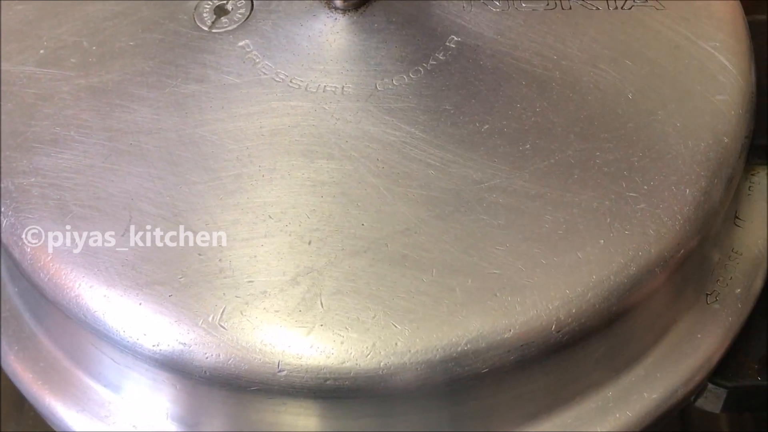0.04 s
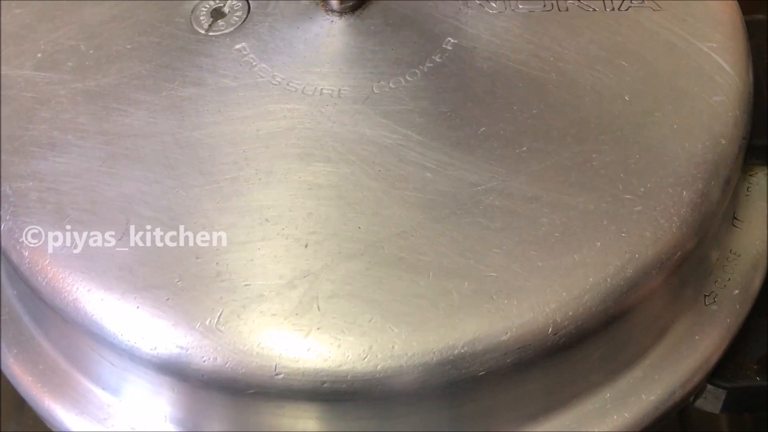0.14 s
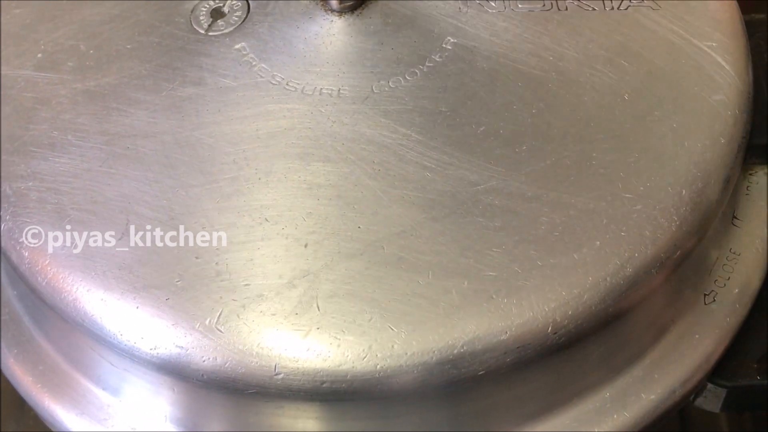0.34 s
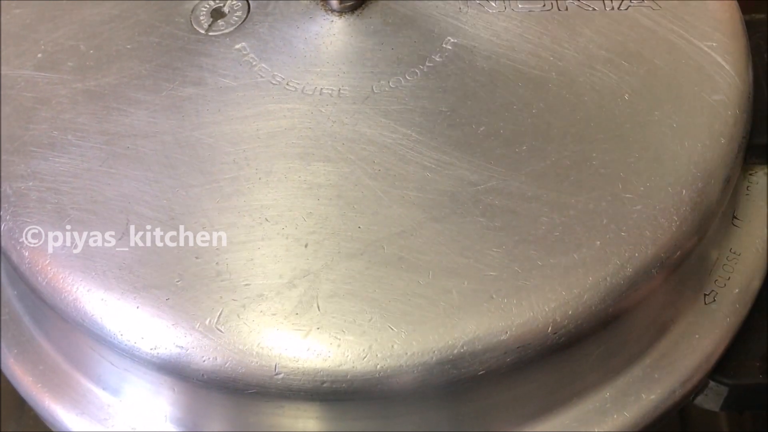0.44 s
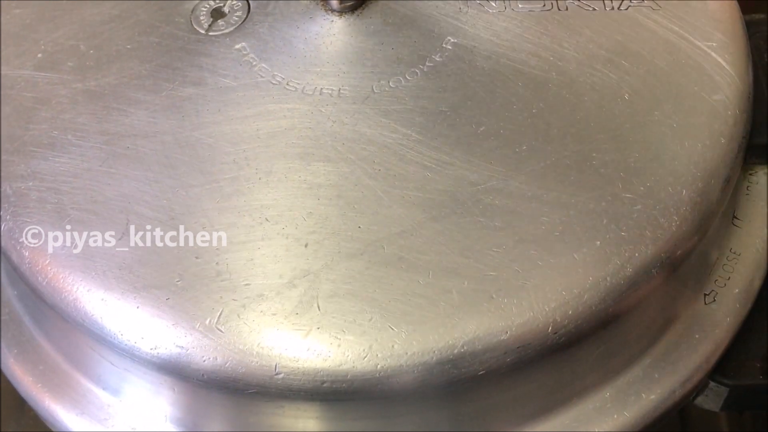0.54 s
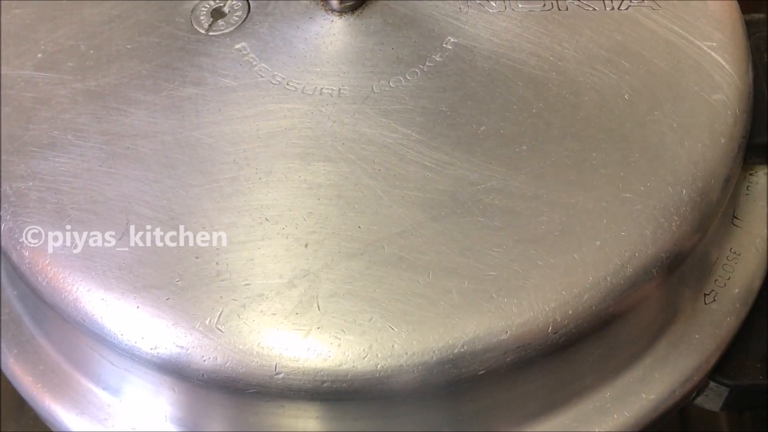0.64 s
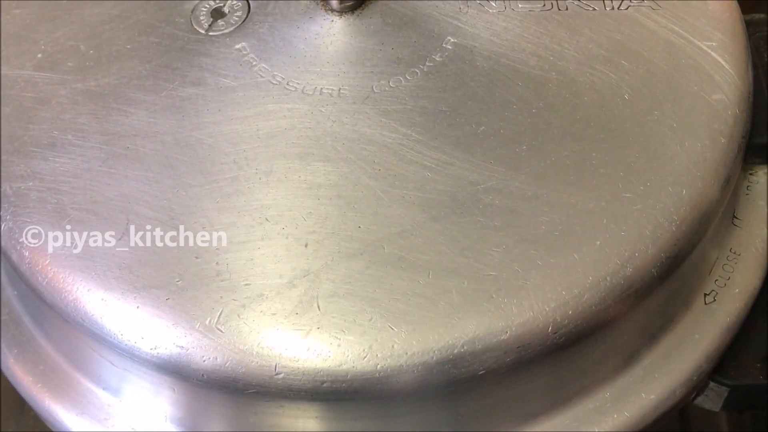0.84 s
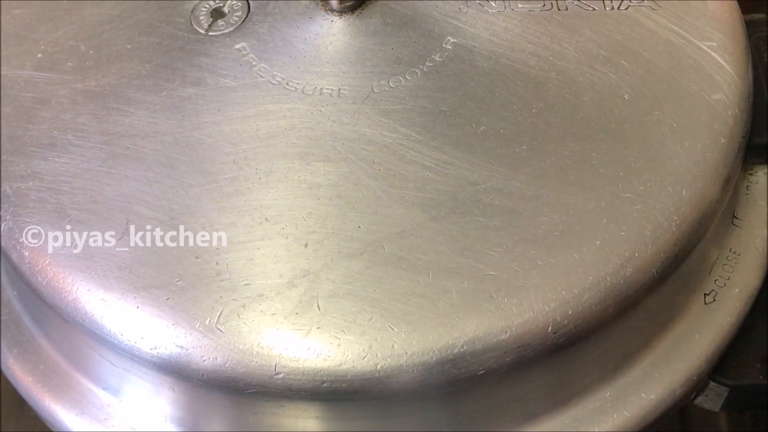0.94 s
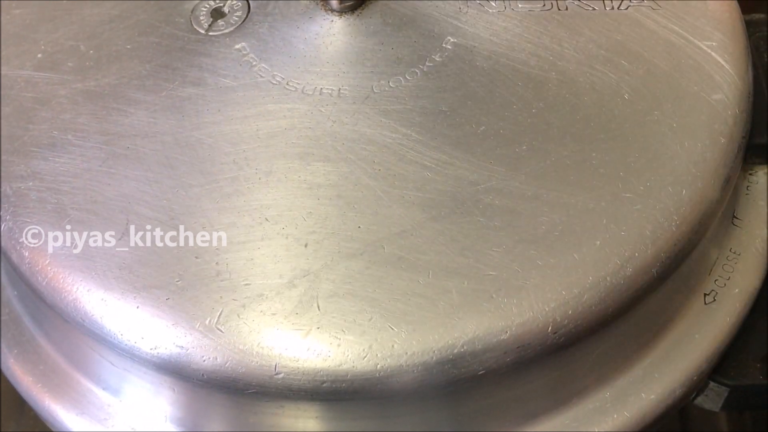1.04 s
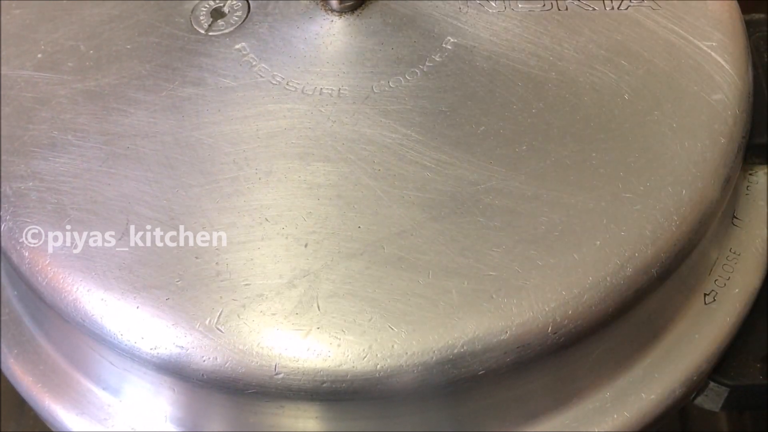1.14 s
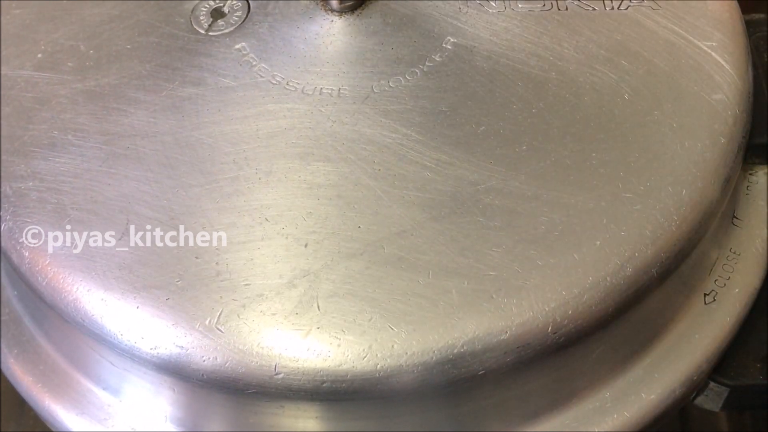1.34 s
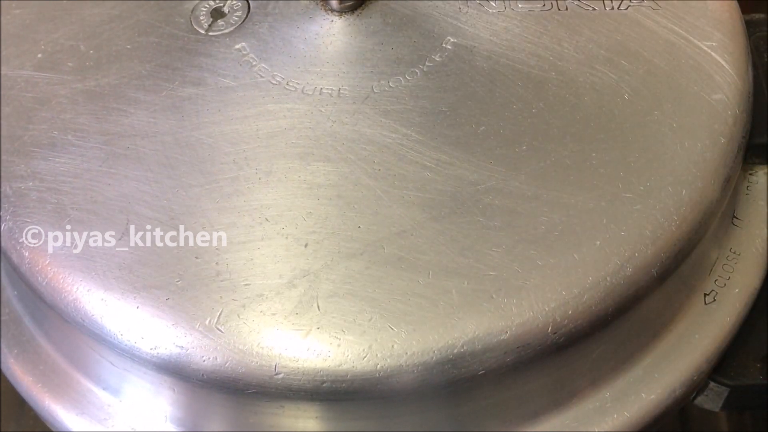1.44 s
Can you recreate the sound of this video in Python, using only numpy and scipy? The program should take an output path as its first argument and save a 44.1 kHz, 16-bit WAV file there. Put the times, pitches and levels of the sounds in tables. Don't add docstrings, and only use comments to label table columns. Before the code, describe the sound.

A pressure cooker lid is twisted loose: quick metal taps, a tiny grind, one bright hard clink with short shimmering ring, then a soft dull knock, over faint hiss and hum, close in a quiet kitchen.

```python
import sys
import numpy as np
from scipy import signal
from scipy.io import wavfile

SR = 44100
rng = np.random.default_rng(int(sys.argv[2]) if len(sys.argv) > 2 else 0)


def generate_wav(signal):
    frames = np.transpose(np.atleast_2d(signal))
    scaled = np.clip(frames, -1, 1) * 32767
    pcm = np.round(scaled).astype(np.int16)
    wavfile.write(sys.argv[1], SR, pcm)


def attenuation_scalar(level_db):
    decades = np.asarray(level_db, float) / 20
    return 10 ** decades


N = 66150

# pitch in Hz, level in dB per Hz.
HUM = [(12, -52), (20, -17), (75, -9), (103, -1), (205, -8), (325, -7.5), (363, -18), (393, -15),
       (900, -23.5), (1170, -54), (1980, -120)]
# pitch in Hz, width in Hz, level in dB.
HUM_LINES = [(101.3, 11, -69), (336, 6, -75.5), (56, 15, -71)]
# pitch in Hz, level in dB per Hz.
HISS = [(350, -31), (600, -8.5), (1390, -1), (2010, -6.5), (4460, -11), (7620, -16), (14700, -18),
        (16000, -21)]
# time in seconds, level in dB.
HISS_LEVEL = [(0, -70.5), (.14, -67.5), (0.221, -69.5), (0.498, -65), (.624, -67), (0.799, -70),
              (1.019, -65), (1.149, -66.5), (1.248, -70), (1.5, -71)]
# time in seconds, level in dB.
TICKS = [(.681, -66), (1.023, -68), (1.099, -68), (1.290, -66), (1.31, -70)]
# center in seconds, half width in seconds, depth in dB.
DUCKS = [(.1075, .008, -28), (.388, .005, -14), (.385, .016, -5), (.535, .007, -16), (.664, .009, -14),
         (.792, .009, -16), (.962, .009, -16), (1.092, .008, -14)]
WHISTLE_HZ = [10130, 13950, 11100, 5800, 14850, 8530, 15200, 11100, 3300, 2570, 14800, 1400, 1350, 1400,
              1500, 4120, 3450]
# start in seconds, length in seconds, level in dB.
WHISTLES = [(0, 1.5, -88), (.6, .09, -84), (.6, .09, -84), (.645, .03, -79), (.76, .1, -81),
            (.76, .11, -81), (.9, .08, -84), (.89, .09, -82), (.94, .04, -78), (.77, .06, -82),
            (1.07, .03, -85), (.65, .03, -76), (.78, .03, -77), (.95, .03, -77), (1.08, .025, -76),
            (.068, .024, -72), (.064, .028, -75)]

# time in seconds, level in dB, contact cut-off in Hz.
TAPS = [(.0925, -36, 2500), (.0945, -34, 2992), (.053, -58, 1489), (.1178, -42.5, 813), (.1612, -35.5, 749),
        (.1720, -46, 800), (.1815, -44.5, 800), (.1892, -41, 900), (.1913, -36, 900), (.1934, -31, 900),
        (.1955, -33, 900), (.2008, -38.5, 900)]
SEATED_HZ = [855, 889, 915, 950, 1040, 1073, 1420, 1477, 1527, 1630, 3345, 3385, 4150, 6379]
# level in dB, time to fall 60 dB in seconds.
SEATED = [(-19.5, .15), (-2, .03), (-12, 0.1), (-2.5, .1), (-14, .04), (-18.5, .11), (-19, 0.022),
          (-11, .1), (1.5, .14), (-14, 0.025), (-9.5, .07), (-3, 0.095), (-5.5, 0.0054), (-12, 0.099)]
# center in seconds, half width in seconds, depth in dB.
GRIP = [(.152, .006, -11.5)]
CRACK_TIMES = [
    .0925,
    .2052,
    .2100,
    .2100,
    .5245,
]
# level in dB, time to fall 60 dB in seconds, lowest Hz, highest Hz.
CRACKS = [(-45, 0.054, 4700, 7000), (-31, 0.049, 4000, 16000), (-21.5, 0.06, 5500, 10000),
          (-31, 0.027, 120, 1800), (-71, 0.083, 340, 1500)]
# time in seconds, level in dB, contact cut-off in Hz.
PUSHES = [
    (.098, -46, 400),
    (.165, -42, 400),
    (.208, -50, 400),
    (.228, -48, 400),
]
# pitch in Hz, level in dB, time to fall 60 dB in seconds.
STAND = [(56.3, -6, 0.56), (106, -1.5, 0.21), (159.5, -3, 0.35), (216.4, -3, 0.063)]

# time in seconds, level in dB, contact cut-off in Hz.
SLIPS = [
    (.2052, -30, 15000),
    (.2063, -33, 15000),
    (.2074, -31, 6000),
]
# time in seconds, level in dB, contact cut-off in Hz.
CLINKS = [
    (.2103, -17.5, 13000),
    (.2112, -34.5, 5846),
]
LOW_HZ = [944, 1335.3, 1356, 1368, 1350.5, 1450, 1822, 2049, 2570, 3359, 3386, 3411, 3444, 3469]
# level in dB, time to fall 60 dB in seconds.
RING_LOW = [(-0.5, .2), (-2, .355), (-3, .285), (-4.5, 0.063), (-33.5, .8), (-7, 0.062), (-26, 0.049),
            (-23.5, .25), (-27.5, 0.17), (-22, 0.16), (-23.5, 0.16), (-24, 0.31), (-28.5, 0.12),
            (2.5, .075)]
HIGH_HZ = [4150, 3780, 5500, 6364, 6420, 6730, 7300, 8510, 8858, 9900, 10480, 12870, 13330, 15400]
# level in dB, time to fall 60 dB in seconds.
RING_HIGH = [(-14.5, 0.04), (-13, .03), (-14, 0.033), (-22, 0.12), (1, 0.023), (-14, .08), (-22.5, 0.051),
             (3.5, 0.014), (-22.5, 0.083), (-9.5, 0.013), (-24, 0.076), (-27, .15), (-2.5, 0.028),
             (-8, .03)]
SWUNG_HZ = [2018, 3466, 3489, 4122, 5278, 6425]
# level in dB, time to fall 60 dB in seconds.
SWUNG = [(-17, 0.39), (-23.5, .5), (-32, .5), (-29, .3), (-42.5, .55), (-36.5, .55)]
# mode number, center in seconds, half width in seconds, depth in dB.
LOBES = [(0, .268, .01, -8), (0, .318, .016, -14), (0, .35, .006, -12), (1, .283, .022, -14),
         (1, .355, .012, -16), (2, .283, .02, -10), (2, .355, .012, -12), (3, .27, .016, -14),
         (1, .47, .03, -8), (4, .3, .012, -10), (5, .33, .015, -8)]
# pitch in Hz, level in dB per Hz.
TAIL = [(500, -18), (900, 1), (1500, 13), (2600, -8.5), (4500, -12), (6000, -9), (10000, -17.5),
        (16000, -13)]
CROWD_HZ = [1826, 3400, 3470, 4100, 5300, 5700, 6030, 6380, 6720, 8400, 8858, 10400, 12900, 15400]
# width in Hz, level in dB, time to fall 60 dB in seconds.
CROWDS = [(40, -52, 0.092), (160, -37, 0.32), (49.7, -51.5, 0.19), (80.5, -53.5, 0.68), (149, -51.5, .4),
          (400, -49, 0.5), (120, -50.5, 0.42), (150, -51, .36), (150, -50.5, 0.66), (500, -54, .3),
          (80.4, -50, 0.6), (600, -59, 0.18), (900, -54.5, .28), (500, -55, .28)]

# time in seconds, level in dB, contact cut-off in Hz.
KNOCKS = [(.519, -56.5, 1230), (.5252, -62.5, 1500), (.5266, -45.5, 1150), (.536, -46, 600),
          (.543, -45.5, 500), (.5675, -53.5, 500), (.577, -57.5, 600)]
# pitch in Hz, level in dB, time to fall 60 dB in seconds.
WORKTOP = [(270, -28, 0.1), (348.4, 0, 0.144), (401, -3, 0.043), (534, -32, 0.077), (696, -2, 0.081),
           (773, -4, 0.047), (870, -0.5, 0.074), (965, 3, 0.044), (1300, -0.5, 0.066), (1613, -4, 0.079),
           (1760, 4, 0.07), (2563, -3, 0.11)]
# start in seconds, length in seconds, pitch in Hz, level in dB.
SWELLS = [(.59, .07, 105, -60), (.75, .07, 104, -63), (1.13, .07, 102, -60), (1.29, .06, 104, -58),
          (1.4, .1, 107, -60), (.6, .13, 327, -69), (1.3, .2, 325, -68), (.93, .18, 244, -69),
          (.71, .11, 279, -69)]

TAIL_S = .2085


def clock():
    return np.arange(N) / SR


def rms_one(x):
    return x / np.sqrt(np.mean(x ** 2) + 1e-20)


def high(x, hz, order):
    return signal.sosfilt(signal.butter(order, hz, "high", fs=SR, output="sos"), x)


def between(x, low_hz, top_hz):
    return signal.sosfilt(signal.butter(2, [low_hz, top_hz], "band", fs=SR, output="sos"), x)


def modes_of(pitches, rows):
    return [(hz, db, t60) for hz, (db, t60) in zip(pitches, rows)]


def ring(force, modes):
    out = 0
    for hz, db, t60 in modes:
        r = attenuation_scalar(-60 / (t60 * SR))
        w = 2 * np.pi * hz / SR
        out = out + signal.lfilter([0, attenuation_scalar(db) * np.sin(w)], [1, -2 * r * np.cos(w), r * r], force + 1e-18)
    return out


def ringing_noise(hz, t60):
    return rms_one(ring(rng.standard_normal(N), [(hz, 0, t60)]))


def blows(rows):
    out = np.zeros(N)
    for s, db, cut_hz in rows:
        u = np.maximum(clock() - s, 0) * 2 * np.pi * cut_hz
        push = u * np.exp(-u)
        out += attenuation_scalar(db) * push / push.sum()
    return out


def bands(spectrum, shape):
    out = 0
    hzs, dbs = np.transpose(spectrum)
    edges = 20 * 2 ** np.arange(0, 10, 1 / 3)
    white = rng.standard_normal((2, N))
    for k, (low, top) in enumerate(zip(edges, edges[1:])):
        hz = np.sqrt(low * top)
        band = between(white[k % 2], low, top)
        level_db = np.interp(np.log(hz), np.log(hzs), dbs, left=-90)
        out = out + attenuation_scalar(level_db) * band * shape(hz)
    return out


def flicker(rate):
    knots = rng.standard_normal(60)
    return np.interp(clock() * rate, np.arange(60), knots)


def dying(start, t60):
    t = clock() - start
    return (t > 0) * attenuation_scalar(-60 * np.maximum(t, 0) / t60)


def dips(rows):
    return attenuation_scalar(sum(db * np.exp(-((clock() - s) / half) ** 4) for s, half, db in rows))


def ducking():
    return dips(DUCKS)


def room_hum():
    rumble = bands(HUM + [(1100, -90)], lambda hz: attenuation_scalar(3.6 * flicker(32)))
    lines = sum(attenuation_scalar(db) * ringing_noise(hz, 12.0 / width) for hz, width, db in HUM_LINES)
    return attenuation_scalar(-61.5) * rms_one(rumble) + lines


def steam_hiss():
    brightens = .4
    shared = flicker(60)
    leak_db = np.interp(clock(), *np.transpose(HISS_LEVEL))
    swing_db = leak_db - leak_db.mean()

    def waver(hz):
        tilt_db = brightens * swing_db * np.log2(hz / 4000)
        return attenuation_scalar(.8 * shared + 0.7 * flicker(25) + tilt_db)

    ticks = sum(attenuation_scalar(db) * dying(s, 0.0057) for s, db in TICKS)
    return rms_one(bands(HISS, waver)) * (attenuation_scalar(leak_db) + ticks) * ducking()


def whistles():
    out, t = 0, clock()
    width_hz, fade_s = 20, 0.0025
    for hz, (s, length, db) in zip(WHISTLE_HZ, WHISTLES):
        fade = np.clip(np.minimum(t - s, s + length - t) / fade_s, 0, 1)
        out = out + attenuation_scalar(db) * ringing_noise(hz, 2.7 / width_hz) * fade
    return out


def seated_lid(rub):
    modes = modes_of(SEATED_HZ, SEATED)
    lows = ring(blows(TAPS) + attenuation_scalar(-6) * rub, modes[:10])
    highs = ring(blows(TAPS[:2]) + attenuation_scalar(-9) * rub, modes[10:])
    return high((lows + highs) * dips(GRIP), 820, order=6)


def cracks():
    out = 0
    for s, (db, t60, low_hz, top_hz) in zip(CRACK_TIMES, CRACKS):
        out = out + attenuation_scalar(db) * between(rng.standard_normal(N), low_hz, top_hz) * dying(s, t60)
    return out


def pot_pushes():
    return ring(blows(PUSHES), STAND)


def grind():
    start_s, end_s, clicks_per_s = .158, .206, 8400
    start_db, end_db = -83, -54
    t = clock()
    born = (rng.random(N) < clicks_per_s / SR) * (t > start_s) * (t < end_s)
    size = attenuation_scalar(1.9 * np.minimum(rng.exponential(1, N), 3)) * rng.choice([-1, 1], N)
    return born * size * attenuation_scalar(np.interp(t, [start_s, end_s], [start_db, end_db]))


def freed_lid(rub):
    lows = modes_of(LOW_HZ, RING_LOW)
    highs = modes_of(HIGH_HZ, RING_HIGH)
    damped = [(hz, db, t60 * 0.061) for hz, db, t60 in highs]
    held = ring(rub, damped) + attenuation_scalar(7.5) * rub
    slips = ring(blows(SLIPS), highs) + ring(blows(SLIPS[2:]), lows[9:])
    clink = ring(blows(CLINKS), lows + highs)
    return high(held + slips + clink + swung(), 1208, order=6)


def swung():
    out = 0
    for k, mode in enumerate(modes_of(SWUNG_HZ, SWUNG)):
        lobes = [row[1:] for row in LOBES if row[0] == k]
        out = out + ring(blows(CLINKS), [mode]) * dips(lobes)
    return out


def dense_tail():
    def fade(hz):
        t60 = .28 * (hz / 4000) ** 0.012
        return dying(TAIL_S, t60) * attenuation_scalar(0.5 * flicker(23))

    tail = bands(TAIL, fade)
    opening = tail[int(TAIL_S * SR):][:441]
    return attenuation_scalar(-34) * tail / np.sqrt(np.mean(opening ** 2))


def shimmer():
    out, longest_s = 0, .36
    for hz, (width, db, t60) in zip(CROWD_HZ, CROWDS):
        out = out + attenuation_scalar(db) * ringing_noise(hz, 6.6 / width) * dying(TAIL_S, min(t60, longest_s))
    return out


def kitchen(x):
    first_s, t60_s, top_hz = 0.0063, .5, 7900
    echo = rng.standard_normal(N) * dying(first_s, t60_s)
    echo = signal.sosfilt(signal.butter(2, top_hz, fs=SR, output="sos"), echo)
    echo = echo / np.sqrt(np.sum(echo ** 2))
    return attenuation_scalar(-25) * signal.fftconvolve(high(x, 2500, order=2), echo)[:N]


def lid():
    rub = grind()
    direct = seated_lid(rub) + freed_lid(rub) + cracks() * ducking()
    return direct + (kitchen(direct) + dense_tail() + shimmer()) * ducking()


def worktop_knock():
    return -high(ring(blows(KNOCKS), WORKTOP), 160, order=2)


def swells():
    out, t = 0, clock()
    for s, length, hz, db in SWELLS:
        rise_and_fall = np.sin(np.pi * np.clip((t - s) / length, 0, 1))
        out = out + attenuation_scalar(db) * np.sin(2 * np.pi * hz * t) * rise_and_fall
    return out


def scene():
    background = room_hum() + steam_hiss() + whistles() + swells()
    return (background + lid() + pot_pushes() + worktop_knock())[None]


def top_cut(x):
    return signal.sosfilt(signal.butter(12, 17150, fs=SR, output="sos"), x)


def record(dry):
    cut = signal.sosfilt(signal.cheby2(10, 30, 16200, fs=SR, output="sos"), dry)
    return top_cut(high(cut, 41.5, order=3))


dry = scene()
out = record(dry)
generate_wav(out)
```